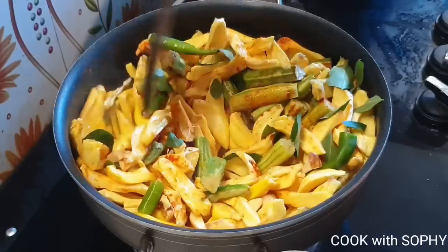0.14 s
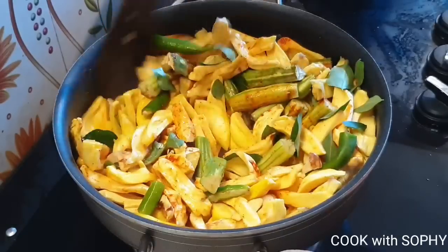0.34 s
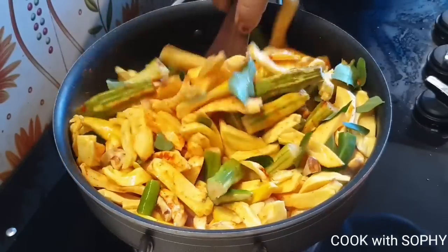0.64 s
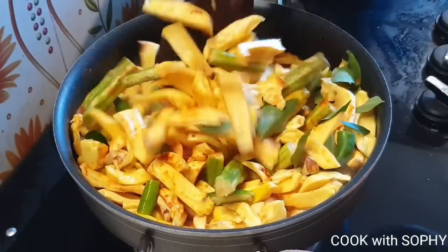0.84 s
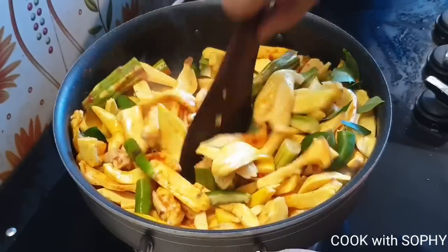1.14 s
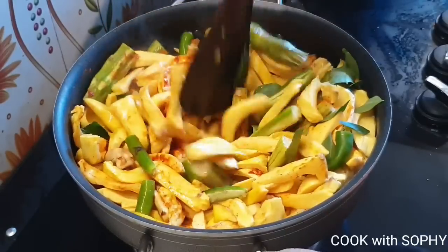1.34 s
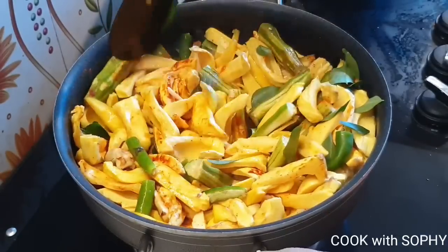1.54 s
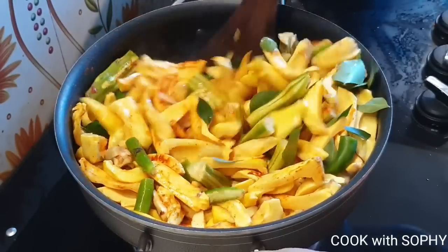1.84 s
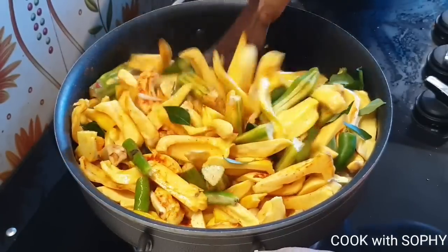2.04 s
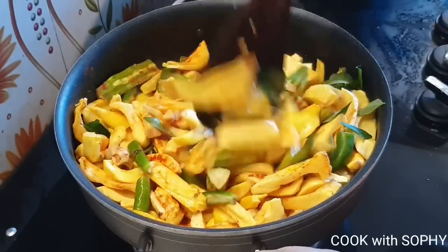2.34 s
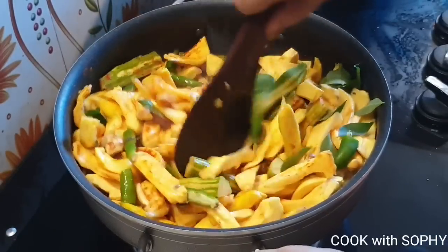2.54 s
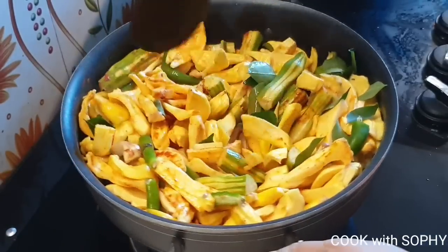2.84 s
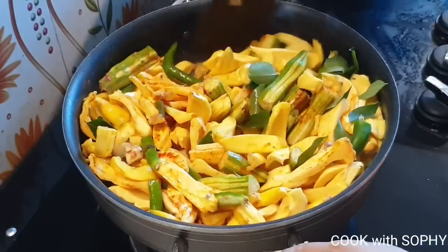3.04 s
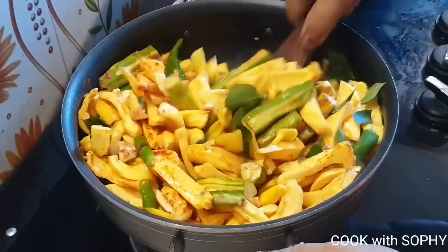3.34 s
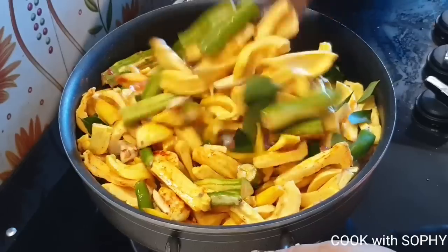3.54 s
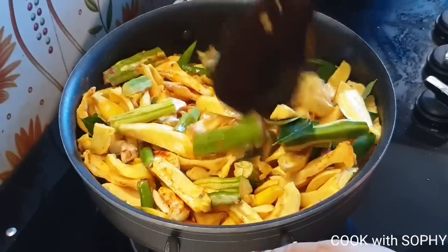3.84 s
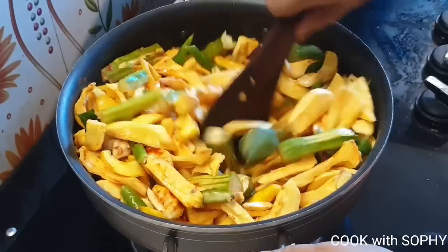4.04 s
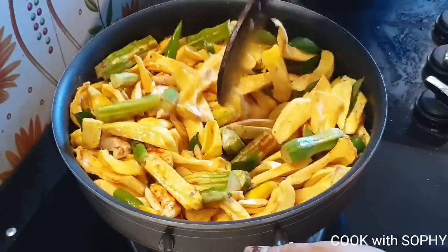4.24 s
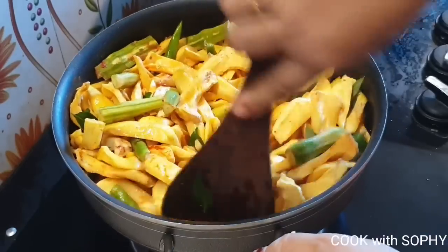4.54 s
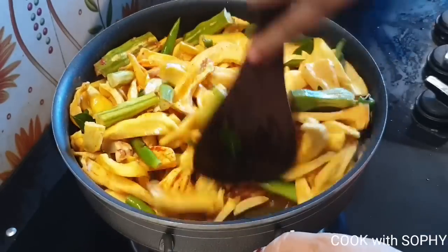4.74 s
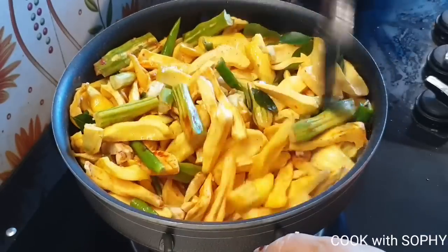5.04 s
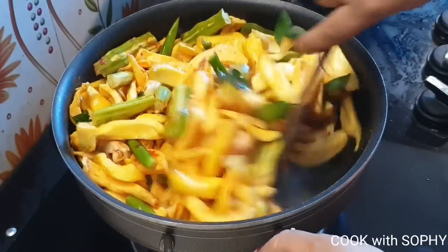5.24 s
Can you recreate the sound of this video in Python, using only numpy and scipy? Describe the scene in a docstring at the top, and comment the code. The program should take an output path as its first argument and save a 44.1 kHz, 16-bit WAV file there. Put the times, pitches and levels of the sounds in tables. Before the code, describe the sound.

Close stereo sound of a wooden spatula turning moist chopped vegetables in a pan, in a small kitchen with short reflections. A soft bump opens, then faint, brief rubs with wet crackle. At 0.55 s a dull woody bump leads into a stronger scraping push until 0.7 s. Quieter strokes and muffled taps follow. A bright hard clack at 1.65 s and two duller knocks by 1.75 s ring the pan briefly amid a loud moist rub. Soft strokes and bumps continue from 1.9 to 2.8 s. Another sharp knock at 3.02 s starts a long scrape, with two knocks near 3.13 s, then lighter rubbing and taps. The fullest push, 4.56-4.7 s, has three resonant knocks. Near-quiet follows until a final bump, crackling rub and falling scrape from 5.24 s. Low hum, uneven rumble and thin hiss, stronger right, stay faint throughout.

```python
"""A wooden spatula turns moist chopped vegetables in a non-stick pan on a kitchen stove, in stereo.
Strokes are trains of random clicks, filtered into rubbing on the pan and crackle of wet pieces.
Cushioned bumps, short gliding scrapes and hard knocks are added; only the knocks ring the pan's modes.
Reflections of a small kitchen follow the blade. Underneath lie a low hum and rumble of shaped noise
and sines, and a thin high hiss, stronger at the right microphone."""
import sys
import numpy as np
from scipy import signal
from scipy.fft import rfft, irfft, next_fast_len
from scipy.io import wavfile

SR = 44100
rng = np.random.default_rng(int(sys.argv[2]) if len(sys.argv) > 2 else 0)


def to_wav(s):
    """Save 16-bit WAV."""
    ch = np.atleast_2d(s).T  # columns
    pcm = np.round(np.clip(ch, -1, 1) * 32767)  # PCM
    wavfile.write(sys.argv[1], SR, pcm.astype(np.int16))


N = 237919

# pushes of the blade through the food:
# (start [s], end [s], rubbing of wood on the pan [relative dB], crackle of the wet pieces [dB])
STROKES = [(0.0, 0.085, -53.5, -59.5), (0.318, 0.366, -64, -56), (0.411, 0.503, -55, -54.5),
           (0.55, 0.681, -40, -52.5), (0.81, 0.998, -61, -63), (1.142, 1.29, -55, -55),
           (1.364, 1.425, -51, -61), (1.668, 1.812, -40, -45), (1.907, 2.02, -47, -54),
           (2.253, 2.35, -56, -58.5), (2.446, 2.546, -51.5, -50.5), (2.633, 2.682, -52, -52),
           (2.73, 2.774, -57, -56), (3.011, 3.195, -39, -44), (3.301, 3.43, -43.5, -55.5),
           (3.528, 3.583, -50.5, -74), (3.962, 4.093, -47, -50), (4.577, 4.705, -34.5, -44),
           (5.144, 5.188, -54.5, -56), (5.236, 5.333, -38.5, -45)]


def amp(db):
    """Decibels to gain."""
    return 10 ** (np.asarray(db) / 20)


def evened(x):
    """Scales to rms 1."""
    return x / np.sqrt(np.mean(x ** 2) + 1e-20)


def read(points, hz):
    """Reads a table on a log-frequency axis."""
    f, value = np.transpose(points)
    return np.interp(np.log(hz + 1), np.log(f + 1), value)


def add(mix, s, sound):
    """Mixes a stereo sound in at time s."""
    part = mix[:, max(0, round(s * SR)):][:, :sound.shape[1]]
    part += sound[:, :part.shape[1]]


def drift(cutoff_hz):
    """Slow random wandering of rms 1: noise whose gain is halved at cutoff_hz."""
    size = next_fast_len(N)
    hz = np.fft.rfftfreq(size, 1 / SR)
    spectrum = rfft(rng.standard_normal(size)) / (1 + (hz / cutoff_hz) ** 4)
    return evened(irfft(spectrum, size)[:N])


def colour(x, shape_db, size=4096):
    """Causal minimum-phase filter with the gain shape_db(hz)."""
    hz = abs(np.fft.fftfreq(size, 1 / SR))
    log_gain = np.log(np.maximum(amp(shape_db(hz)), 1e-5))
    taps = np.fft.ifft(np.exp(np.conj(signal.hilbert(log_gain)))).real[:size // 2]
    return signal.oaconvolve(x, taps[None], axes=1)[:, :x.shape[1]]


def paired(x):
    """Two unrelated signals become a microphone pair: alike in the bass, apart in the treble."""
    # likeness of the two microphones: (frequency [Hz], left-right correlation [-1 to 1])
    likeness = [(60, 0.8), (200, 0.85), (400, 0.67), (800, 0.59), (1500, 0.07), (4000, 0), (9000, 0.12)]
    same = np.clip(read(likeness, np.fft.rfftfreq(x.shape[1], 1 / SR)), -1, 1)
    a, b = rfft(x)
    mid = a * np.sqrt((1 + same) / 2)
    side = b * np.sqrt((1 - same) / 2)
    return irfft(np.array([mid + side, mid - side]), x.shape[1])


def grains(per_s, spread_db):
    """Two random trains of tiny clicks; the wider the spread, the more a few stand out."""
    size = amp(spread_db * np.minimum(rng.exponential(1, (2, N)), 4))
    sign = rng.choice([-1, 1], (2, N))
    present = rng.random((2, N)) < per_s / SR
    return evened(size * sign * present)


def effort(levels_db, growth_db, release_db_per_s, rest_db):
    """Gain over time: every push rises, holds with a slope and dies away, above a faint bed."""
    attack_s = 0.033  # the blade gets up to speed
    # the faint bed sinks steadily, then recovers quickly: (start [s], end [s], depth reached [dB])
    lull_start, lull_end, lull_db = (4.72, 5.16, -9.5)
    t = np.arange(N) / SR
    bed_db = rest_db + np.interp(t, [lull_start, lull_end, lull_end + attack_s], [0, lull_db, 0])
    power = amp(bed_db) ** 2
    for (start, end, *_), db in zip(STROKES, levels_db):
        rise = np.clip((t - start) / attack_s, 0, 1)
        slope_db = growth_db * np.interp(t, [start, end], [-.5, .5])
        release_db = release_db_per_s * np.maximum(t - end, 0)
        power = power + (rise * amp(db + slope_db - release_db)) ** 2
    return np.sqrt(power)


def stirring(slips_db=2.0, clumps_db=1.7, catches_db=-7, snaps_db=-10):
    """Slips and sparser catches of the blade rub; wet pieces crackle in clumps and a few snap apart."""
    # wood rubbing on the coating: (frequency [Hz], relative level [dB])
    rub_shape = [(150, -6.5), (400, -7.5), (700, -3), (1100, 1), (1400, -0.5), (1900, -2.5), (2600, -6.5),
                 (4000, -13), (8000, -75)]
    # wet pieces parting: (frequency [Hz], relative level [dB])
    wet_shape = [(300, -13.5), (1000, 3), (3000, 4), (5000, 2.5), (8000, 1.5), (10500, 1), (13000, -1),
                 (15500, -10)]
    _, _, rub_db, wet_db = np.transpose(STROKES)

    catches = amp(catches_db) * grains(per_s=45, spread_db=2.0)
    slips = paired(grains(per_s=1800, spread_db=slips_db) + catches)
    slips = slips * amp(clumps_db * drift(55))
    rub = evened(colour(slips, lambda hz: read(rub_shape, hz)))
    # both layers lose level over a push (the crackle more), then die away into the faint bed
    rub = rub * effort(rub_db, growth_db=-1.5, release_db_per_s=170, rest_db=-59)

    pops = grains(per_s=5400, spread_db=4.0) * amp(0.69 * drift(59))
    pops = pops + amp(snaps_db) * grains(per_s=30, spread_db=0.0)
    wet = evened(colour(pops, lambda hz: read(wet_shape, hz)))
    wet = wet * effort(wet_db, growth_db=-4.5, release_db_per_s=162, rest_db=-61)
    return amp(-6.5) * rub + wet


def kitchen(x):
    """Sparse reflections of random sign, each band dying at its own speed."""
    # decay of the room: (frequency [Hz], t60 [s])
    room_decay = [(150, 0.31), (600, 0.28), (2000, 0.27), (6000, 0.22), (14000, 0.28)]
    size = SR // 2
    taps = rng.choice([-1., 1.], (2, size)) * (rng.random((2, size)) < 1 / 10)
    # the reflections start a few milliseconds after the direct sound and build up
    build_up = np.clip(np.arange(size) / SR / 0.0047 - .6, 0, 1)
    taps = paired(taps * build_up)
    hz, t, bands = signal.stft(taps, SR, nperseg=256)
    decay = amp(-60 * t / read(room_decay, hz)[:, None])
    tail = signal.istft(bands * decay, SR, nperseg=256)[1]
    return signal.fftconvolve(x, tail / np.linalg.norm(tail[0]), axes=1)[:, :x.shape[1]]


def background():
    """Shaped noise whose low rumble swells and sinks, with hum sines wavering in pitch and level."""
    # stove and kitchen background: (frequency [Hz], relative density [dB per Hz])
    floor_shape = [(20, -31.5), (38, -16), (55, -7), (70, 2.5), (90, -3.5), (135, -7.5), (165, -9),
                   (205, -7), (250, -21), (330, -18.5), (600, -23), (1200, -51.5), (3300, -54), (7000, -36),
                   (11000, -34), (15500, -67)]
    # slow swell of the low rumble: (time [s], relative level [dB])
    rumble_swell = [(0, 4.5), (0.9, -2), (1.65, -2), (2.1, 4), (2.5, 3), (2.7, -7), (3.0, -6), (3.25, 1),
                    (4.1, 5.5), (4.6, 1), (4.9, -2.5), (5.39, -0.5)]
    # notes of the hum: (frequency [Hz], mean level [dB])
    hum_notes = [(105, -52.5), (209, -64.5), (300, -67)]
    noise = paired(rng.standard_normal((2, N)))
    floor = evened(colour(noise, lambda hz: read(floor_shape, hz), size=16384))
    rumble_filter = signal.butter(4, 98, fs=SR, output="sos")  # top of the rumble, Hz
    low = signal.sosfiltfilt(rumble_filter, floor)
    swell_db = np.interp(np.arange(N) / SR, *np.transpose(rumble_swell)) - 1.0
    floor = floor - low + low * amp(swell_db)
    hum = 0
    for hz, db in hum_notes:
        level = amp(db + 1.55 * drift(4.4)) * np.sqrt(2)
        phase = 2 * np.pi * np.cumsum(hz + 1.7 * drift(6.4)) / SR
        hum = hum + level * np.sin(phase)
    return amp(-50.0 + 1.3 * drift(2.1)) * floor + hum


def hiss(centre_hz=9020, width_hz=400, core_hz=90, wander_hz=110):
    """A thin high hiss with an unsteady whistling core, stronger on the right."""
    def band(half_width_hz):
        """Noise in one resonance."""
        def shape_db(hz):
            """Gain falling away on both sides of the centre."""
            return -20 * np.log10(1 + ((hz - centre_hz) / half_width_hz) ** 2)
        return evened(colour(rng.standard_normal((2, N)), shape_db))

    # shifting the narrow band up and down makes the core wander in pitch
    core = signal.hilbert(band(core_hz))
    wander = np.exp(2j * np.pi * np.cumsum(wander_hz * drift(9)) / SR)
    core = (core * wander).real
    return evened(band(width_hz) + core) * amp([[-64.5], [-57]])


def blow(x):
    """Scales a hit so that its energy equals 10 ms at rms 1."""
    return x * np.sqrt(SR / 100 / (np.sum(x ** 2) / 2 + 1e-20))


def thud(bright_hz, wood_hz, wood_db, tick=3.25, clack_t60_at_4khz=0.049, wood_cycles=24,
         chatter=0.072, clack_db=-3):
    """The dry part of a blow: a contact tick, a dense clack and the damped note of the blade."""
    # dense, quickly dying vibration after a blow: (frequency [Hz], relative level [dB])
    clack_shape = [(100, -16), (250, -7), (450, -3.5), (900, 0.5), (1250, -3), (1600, 0.5), (2600, -1),
                   (3600, -4.5), (4600, -1.5), (7000, 0), (10500, -8), (15500, -8)]
    t = np.arange(SR // 2) / SR
    # a soft contact dies sooner and leaves out the treble
    clack_t60 = clack_t60_at_4khz * (bright_hz / 4000) ** 0.17
    clack = paired(rng.standard_normal((2, len(t))) * amp(-60 * t / clack_t60))
    # the tick reaches the right microphone a moment later, and stronger
    clack[0, 0] += tick
    clack[1, 2] += tick * 1.8
    clack = colour(clack, lambda hz: read(clack_shape, hz) - 10 * np.log10(1 + (hz / bright_hz) ** 3.9))
    # bright contacts add a sharp snap, strongest on the right
    snap_note = np.sin(2 * np.pi * np.array([[11000], [9700]]) * t)
    snap = np.exp(-t / .0005) * snap_note * np.array([[2], [5.5]])
    snap /= 1 + (8000 / bright_hz) ** 6
    # the blade chatters for a moment; its note falls 60 dB in wood_cycles periods
    push = chatter * rng.standard_normal((2, len(t))) * np.exp(-t / 0.011)
    # the note reaches the right microphone a moment later
    push[0, 0] += 2
    push[1, 4] += 2
    note = np.sin(2 * np.pi * wood_hz * t) * amp(-60 * t * wood_hz / wood_cycles)
    wood = signal.fftconvolve(push, note[None], axes=1)[:, :len(t)]
    # the note is slightly stronger at the left microphone
    wood = amp(wood_db - 3.5) * blow(wood) * amp([[.8], [-.8]])
    return snap + amp(clack_db) * blow(clack) + wood


def bumps(room_db=-5):
    """Blows cushioned by food leave the pan silent: a dull contact and the note of the blade."""
    # (time [s], force [dB], pitch of the wooden knock [Hz], wood [relative dB])
    cushioned = [(0.019, -42.5, 703, 11.5), (0.0879, -49, 1640, 7.5), (0.5625, -33.5, 1454, 7.5),
                 (0.939, -49.5, 1070, -5), (1.255, -56, 2020, 6.5), (1.339, -47, 1120, 2.5),
                 (1.964, -49, 1130, 5.5), (2.473, -40.5, 2560, -6), (2.662, -45.5, 1130, -3),
                 (3.4447, -46.5, 1800, 7.5), (4.016, -47, 1124, 2), (4.073, -48, 1810, 9.5),
                 (4.217, -49.5, 684, 7.5), (4.954, -62.5, 1160, 8.5), (5.247, -40.5, 1470, -2)]
    brightness = 1.4  # a cushioned contact reaches this multiple of its pitch
    out = np.zeros((2, N))
    for s, force_db, wood_hz, wood_db in cushioned:
        hit = thud(brightness * wood_hz, wood_hz, wood_db)
        add(out, s, amp(force_db) * (hit + amp(room_db) * kitchen(hit)))
    return out


def scrapes(width_hz=170):
    """Uneven slips keep exciting a resonance of the blade, which glides as the contact moves."""
    # the blade pressed hard along the pan judders:
    # (start [s], end [s], first pitch [Hz], last pitch [Hz], level [dB])
    judders = [(0.544, 0.61, 1430, 1290, -50), (0.601, 0.705, 1100, 1160, -43),
               (1.73, 1.758, 1420, 1420, -33.5), (5.277, 5.397, 1030, 875, -47.5)]
    out = np.zeros((2, N))
    for start, end, first_hz, last_hz, db in judders:
        hz = np.geomspace(first_hz, last_hz, max(round((end - start) * SR), 64))
        slips = paired(grains(per_s=3100, spread_db=0.5)[:, :len(hz)])
        # shift the gliding pitch down to zero, resonate there, and shift back up
        turn = np.exp(2j * np.pi * np.cumsum(hz) / SR)
        r = np.exp(-2 * np.pi * width_hz / SR)
        note = (turn * signal.lfilter([1], np.poly([r, r]), slips / turn)).real
        add(out, start, amp(db) * evened(note * signal.windows.tukey(len(hz), .4)))
    return out


def pan_ring(place, free_s, damping_s=0.0061, port_radians=0.46):
    """The pan's modes ring freely until blade and food settle on it and damp them."""
    # modes of the pan: (frequency [Hz], t60 [s],
    # level struck on the near wall [dB], on the far wall [dB], on the bottom [dB]), levels relative
    pan_modes = [(347, .16, -16, -15, -18), (624, .12, -22, -12, -14), (767, .12, -10, -14, -11),
                 (1384, .13, -2, -16, -14), (1421, .21, -18, -17, -2), (1655, .14, -6, -5, -11),
                 (2048, .32, -6, 0, -1), (2219, .23, -1, -6, -15), (2722, .22, -14, -12, -9),
                 (3104, .16, 0, -12, -8), (4042, .2, -16, -16, -13), (4414, .11, -10, -10, -20),
                 (5000, .1, -24, -9, -25), (5317, .15, -3, -7, -16), (6450, .12, -15, -12, -22),
                 (7784, .17, -13, -18, -24)]
    t, ring = np.arange(SR // 2) / SR, 0
    for k, (hz, t60, *place_db) in enumerate(pan_modes):
        # each mode has its own lobes, so its phase differs between the microphones
        lobe = port_radians * np.sqrt(hz / 1000) * (-1) ** k * np.array([[1], [-1]])
        phase = rng.uniform(0, 2 * np.pi) + lobe
        level = amp(np.interp(place, [0, 1, 2], place_db) - 60 * t / t60)
        ring = ring + level * np.sin(2 * np.pi * hz * t + phase)
    return blow(ring) * np.exp(-np.maximum(t - free_s, 0) / damping_s)


def knocks(free_ring_s=0.1, room_db=-5.5):
    """Hard blows ring the pan until the food damps it; each has its own spot and reflections."""
    # blade on bare pan: (time [s], force [dB], contact brightness [Hz], pitch of the wooden knock [Hz],
    # wood [relative dB], pan ring [relative dB], place [0 near wall, 1 far wall, 2 and above bottom])
    hard_blows = [(1.6474, -23.5, 11900, 516, -9, -5, 0.074), (1.7214, -26.5, 1780, 1180, -4, 0.5, 4.1),
                  (1.7498, -26.5, 2930, 627, -9.5, -9.5, 2.7), (3.0207, -22.5, 8800, 597, -18, -5, 0.76),
                  (3.1259, -26, 2700, 4180, -2, 0, 2.2), (3.1432, -31, 3300, 1530, 1, -2.5, 1.8),
                  (4.564, -23.5, 5700, 720, -6, 4.5, 0.012), (4.644, -27, 2470, 1223, 5.5, 2, 2.6),
                  (4.6778, -24.5, 4850, 2300, 3.5, -4, 2.1)]
    out = np.zeros((2, N))
    for s, force_db, bright_hz, wood_hz, wood_db, ring_db, place in hard_blows:
        hit = thud(bright_hz, wood_hz, wood_db)
        ring = amp(ring_db) * pan_ring(place, free_ring_s)
        add(out, s, amp(force_db) * (hit + amp(room_db) * kitchen(hit) + ring))
    return out


def scene():
    """Knocks, bumps, scrapes and stirring in the small room, over the background."""
    stir = stirring() + scrapes()
    return knocks() + bumps() + stir + amp(-5.0) * kitchen(stir) + background() + hiss()


def record(dry):
    """The band limit of the recorder: a steep low-pass at 15600 Hz."""
    band_limit = signal.firwin(511, 15600, window=("kaiser", 9), fs=SR)
    return signal.oaconvolve(dry, band_limit[None], "same")


dry = scene()
out = record(dry)
to_wav(out)
```